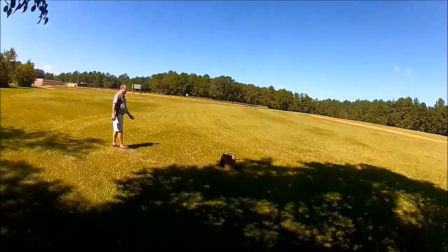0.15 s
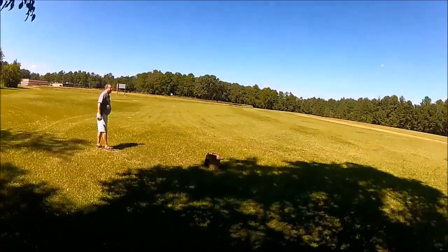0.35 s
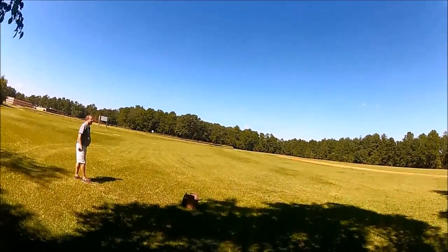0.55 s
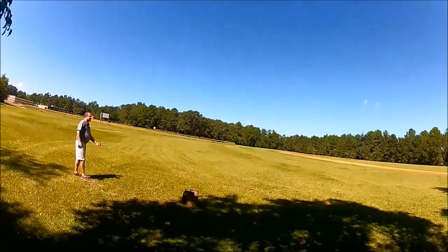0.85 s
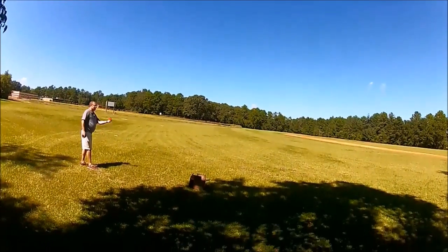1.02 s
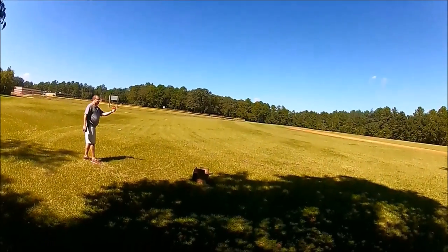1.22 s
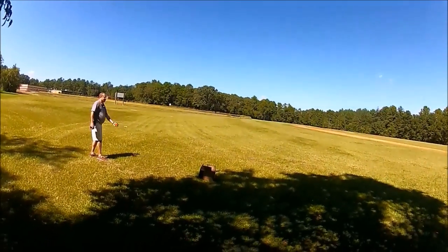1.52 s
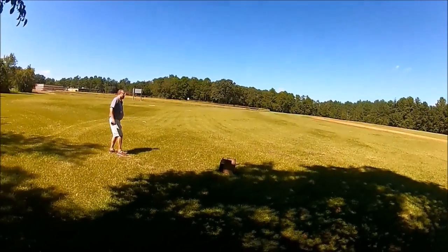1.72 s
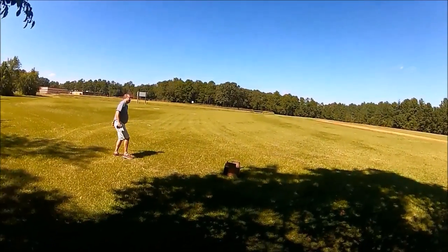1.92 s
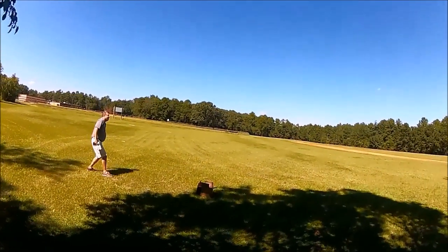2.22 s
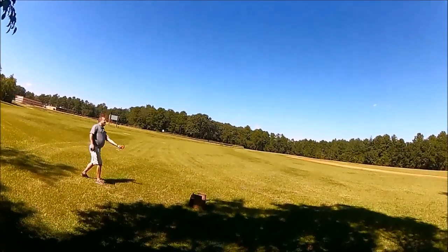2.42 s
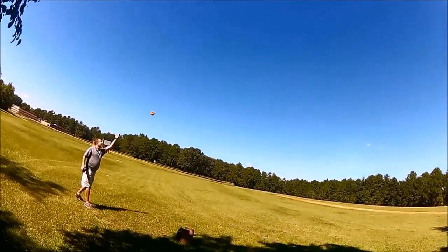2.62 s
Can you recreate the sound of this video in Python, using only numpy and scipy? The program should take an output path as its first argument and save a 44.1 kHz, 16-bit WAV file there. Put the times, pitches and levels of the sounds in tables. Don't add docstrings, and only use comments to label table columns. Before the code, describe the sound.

Wind rumbling and thumping on a microphone in an open field, with two tiny faint snaps

```python
import sys
import numpy as np
from scipy import signal
from scipy.fft import rfft, irfft
from scipy.io import wavfile
from scipy.ndimage import uniform_filter1d

SR = 44100
rng = np.random.default_rng(int(sys.argv[2]) if len(sys.argv) > 2 else 0)


def invert_db(level):
    return 10 ** (np.asarray(level, dtype=float) / 20)


def output_pcm(signal):
    pcm = np.clip(np.atleast_2d(signal).T, -1, 1) * 32767
    wavfile.write(sys.argv[1], SR, np.round(pcm).astype(np.int16))


N = 121275

# (frequency [Hz], level [dB per Hz])
RUMBLE_COLOUR = [(150, -50), (250, -4.5), (435, -12.5), (683, -9.5), (964, -23.5), (1500, -35.5),
                 (1950, -43), (3300, -120)]
# (frequency [Hz], level [dB per Hz])
HISS_COLOUR = [(650, -11.5), (1100, -4), (1670, -4.5), (1900, -2), (2080, -1.5), (2270, -3.5), (3260, -7),
               (4910, -9), (5990, -18.5), (7790, -66), (13200, -120)]
# (time [s], level [dB])
CHORUS_SWELL = [
    (0, -73),
    (1.2, -77),
    (1.45, -83),
    (1.93, -81),
    (2.03, -72),
    (2.35, -75.5),
    (2.75, -77.5),
]
# (time [s], peak [dB], length [s], pitch [Hz])
STRING_BURSTS = [
    (.5823, -56, .0013, 3950),
    (.5829, -63, .0013, 5050),
    (.9147, -50, .0016, 3950),
    (.9154, -54, .0014, 5100),
    (.9171, -59, .0012, 5000),
]
# (frequency [Hz], level [dB], decay by 60 dB [s])
LIMB_MODES = [
    (3000, -25, .012),
    (4000, -40, .005),
    (5160, -36, 0.0093),
]
# (time [s], peak [dB], pitch [Hz])
AIR_LUMPS = [
    (0.453, -26, 70),
    (.695, -30, 64),
    (.805, -30.5, 111),
    (1.42, -33, 86),
    (1.499, -29, 84),
    (1.641, -21, 150),
    (1.821, -24, 83.5),
    (2.286, -26, 114),
    (2.49, -28, 94),
    (2.602, -28, 75),
]
# (time [s], level [dB], extra brightness [dB per octave])
GUST_STRENGTH = [(0.0, -42, -0.5), (0.14, -43.5, -1.5), (0.26, -47, 0.0), (0.47, -41, -1.5),
                 (0.61, -45, 4.5), (0.68, -40, -1), (0.88, -39, -1), (0.96, -44.5, 1.5), (1.09, -38.5, 1.5),
                 (1.39, -41.5, 2.5), (1.43, -30, -4), (1.47, -40.5, 4.5), (1.5, -32.5, -1.5),
                 (1.55, -38.5, 1.5), (1.65, -34, 0.0), (2.14, -39, 0.0), (2.63, -39, -0.5),
                 (2.75, -40, -0.5)]
# (frequency [Hz], level [dB per Hz])
WIND_COLOUR = [(12, -53), (20, -16), (49, -7), (86, 0.5), (140, -3), (172, -3), (239, -7), (345, -18),
               (520, -26), (680, -32.5), (1140, -120)]
# (time [s], length [s])
TOP_DROPOUTS = [
    (.445, 0.037),
    (.705, .04),
    (.875, .05),
    (1.43, .04),
    (2.05, .035),
    (2.325, .035),
    (2.54, .04),
    (2.685, .03),
]


def rms_one(x):
    return x / np.sqrt(np.mean(x ** 2) + 1e-20)


def in_time(rows, order=1):
    rows = np.array(rows)
    return np.interp(np.arange(N) / SR, rows[:, 0], rows[:, order])


def drift(rate_hz):
    r = np.exp(-80 * np.pi * rate_hz / SR)
    slow = signal.lfilter([1], [1, -2 * r, r * r], rng.standard_normal(N // 40 + 2002))
    slow = rms_one(slow[2000:])
    return np.interp(np.arange(N) / 40, np.arange(len(slow)), slow)


def banded_noise(spectrum, patchy_db, flicker_hz, tilt_db=0):
    hz, db = np.transpose(spectrum)
    octave = np.log2(np.maximum(np.arange(N // 2 + 1) * SR / N, 1))
    colour = invert_db(np.interp(octave, np.log2(hz), db, left=-90, right=-90))
    full = rfft(rng.standard_normal(N)) * colour
    out = 0
    together = drift(flicker_hz / 3)
    for centre in np.arange(4, 13, .5):
        share = np.clip(1 - 2 * abs(octave - centre), 0, 1)
        if np.max(share * colour) > 1e-4:
            flicker_db = patchy_db * (0.2 * together + drift(flicker_hz))
            gain = invert_db(flicker_db + tilt_db * (centre - np.log2(100)))
            out = out + gain * irfft(full * share, N)
    return rms_one(out)


def distant_rumble():
    return invert_db(-55.5) * banded_noise(RUMBLE_COLOUR, patchy_db=1.4, flicker_hz=6.2)


def far_hiss():
    return invert_db(-69.5) * banded_noise(HISS_COLOUR, patchy_db=0.67, flicker_hz=7.1)


def chorus():
    band = signal.butter(2, [1750, 2710], "band", fs=SR, output="sos")
    return invert_db(in_time(CHORUS_SWELL)) * rms_one(signal.sosfilt(band, rng.standard_normal(N)))


def insect_note():
    centre_s, length_s = .455, .036
    note_hz, sag_hz, level_db = 2120, 40, -68.5
    u = np.clip((np.arange(N) / SR - centre_s) / length_s, -.5, .5)
    phase = 2 * np.pi * np.cumsum(note_hz - sag_hz * u) / SR
    swell = np.sqrt(np.cos(np.pi * u).clip(0))
    return invert_db(level_db) * swell * np.sin(phase)


def snaps():
    t = np.arange(N) / SR
    whip = np.full(N, 1e-18)
    for start, db, length, hz in STRING_BURSTS:
        u = np.clip((t - start) / length, 0, 1)
        shape = np.abs(np.sin(np.pi * u)) ** 0.22 * (u < 1)
        whip = whip + invert_db(db) * shape * np.sin(2 * np.pi * hz * length * u)
    out = whip
    for hz, db, t60 in LIMB_MODES:
        r = invert_db(-60 / (t60 * SR))
        w = 2 * np.pi * hz / SR
        ring = signal.lfilter([0, np.sin(w)], [1, -2 * r * np.cos(w), r * r], whip)
        out = out + invert_db(db) * ring
    return out


def flutter():
    centre_s, length_s, level_db = 1.655, .06, -49
    band = signal.butter(4, [230, 570], "band", fs=SR, output="sos")
    air = rms_one(signal.sosfilt(band, rng.standard_normal(N)))
    return invert_db(level_db) * air * np.exp(-((np.arange(N) / SR - centre_s) / length_s) ** 2)


def lumps():
    t = np.arange(N) / SR
    out = np.zeros(N)
    for centre, db, hz in AIR_LUMPS:
        cycles = (t - centre) * hz
        out = out + invert_db(db) * np.cos(2 * np.pi * cycles) * np.exp(-(cycles / 0.447) ** 2)
    return out


def wind():
    brightens, evenness, even_over_s, lump_clears = 0.38, 0.95, 0.048, 0.22
    t = np.arange(N) / SR
    db = in_time(GUST_STRENGTH)
    tilt_db = brightens * (db - db.max() + 3.5) + in_time(GUST_STRENGTH, order=2)
    air = banded_noise(WIND_COLOUR, patchy_db=0.98, flicker_hz=18.6, tilt_db=tilt_db)
    power = uniform_filter1d(air ** 2, int(even_over_s * SR))
    air = rms_one(air / (power + 0.076) ** (evenness / 2))
    clear = np.ones(N)
    for centre, _, hz in AIR_LUMPS:
        clear = clear * (1 - lump_clears * np.exp(-((t - centre) * hz) ** 2))
    return invert_db(db) * air * clear


def scene():
    field = distant_rumble() + far_hiss() + chorus()
    events = insect_note() + snaps()
    port = flutter() + lumps() + wind()
    return (field + events + port)[None]


def hold_samples(dry):
    both = np.concatenate([dry, dry[:, ::-1]], axis=1)
    held = np.repeat(signal.resample(both, 2 * N * 12000 // SR, axis=1), 4, axis=1)
    return signal.resample(held, 2 * N, axis=1)[:, :N]


def thin_top(x):
    low_edge_hz, high_edge_hz, strip_hz = 12900, 15260, 170
    weakest_hz, weakest_width_hz = 13700, 720
    t = np.arange(N) / SR
    f = np.arange(N // 2 + 1) * SR / N
    full = rfft(x[0])
    dropout = sum(abs(t - s) < length / 2 for s, length in TOP_DROPOUTS) > 0
    out = irfft(full * (f < low_edge_hz), N)
    for low in np.arange(low_edge_hz, high_edge_hz, strip_hz):
        off_share = .12 + .6 * np.exp(-((low - weakest_hz) / weakest_width_hz) ** 4)
        chance = drift(10)
        off = chance < np.quantile(chance, np.clip(off_share, 0, 1))
        gain_db = np.where(off, -25, 1.5)
        gain_db = np.where(dropout & (low > 13300) & (chance < 1.1), -25, gain_db)
        strip = irfft(full * (f >= low) * (f < low + strip_hz), N)
        out = out + uniform_filter1d(invert_db(gain_db), size=300) * strip
    end_fade = np.clip((t[-1] - t) / .003, 0, 1)
    return out[None] * end_fade


def low_pass(x):
    return signal.sosfilt(signal.butter(12, 15190, fs=SR, output="sos"), x)


def record(dry):
    held = hold_samples(dry)
    noisy = held + invert_db(-101) * rng.standard_normal(dry.shape)
    mix = thin_top(noisy)
    return low_pass(mix)


dry = scene()
out = record(dry)
output_pcm(out)
```